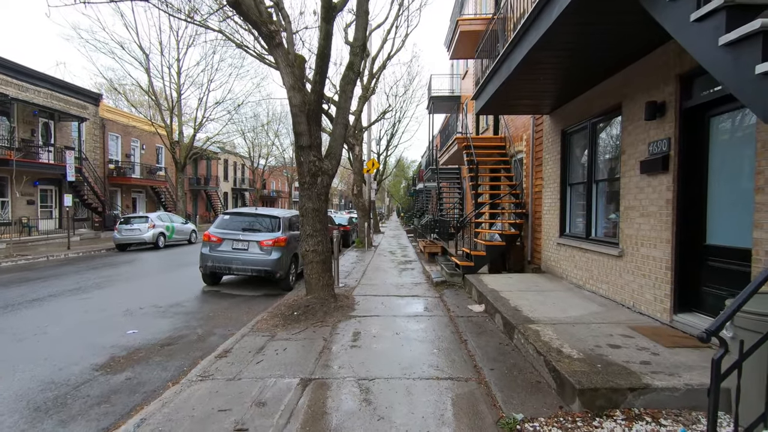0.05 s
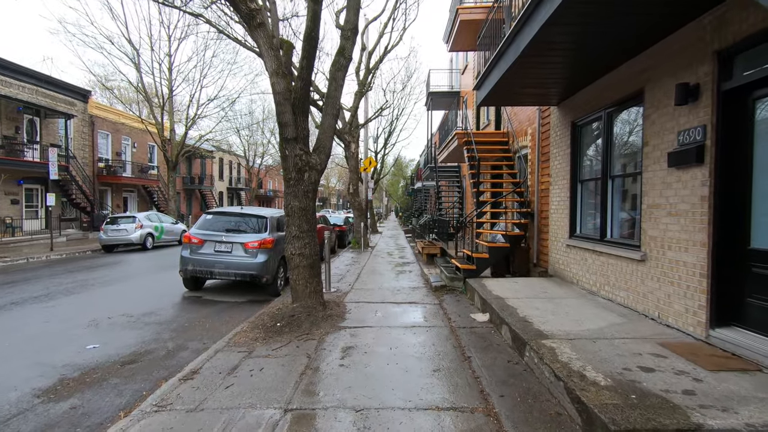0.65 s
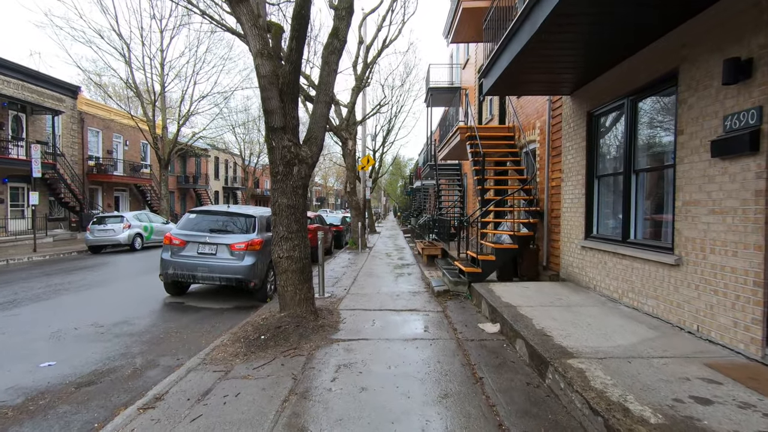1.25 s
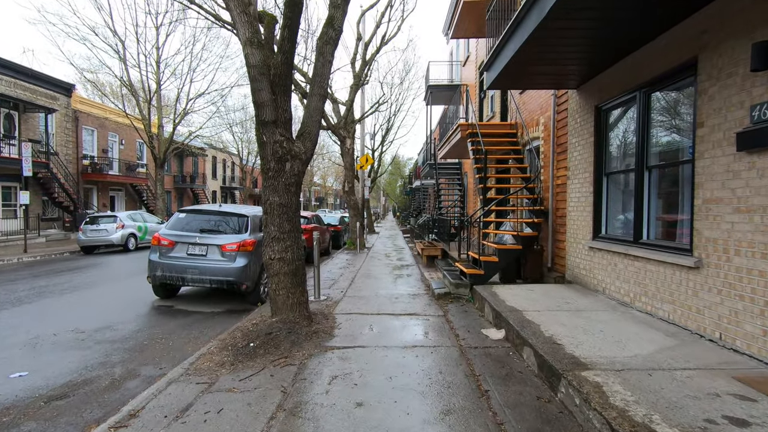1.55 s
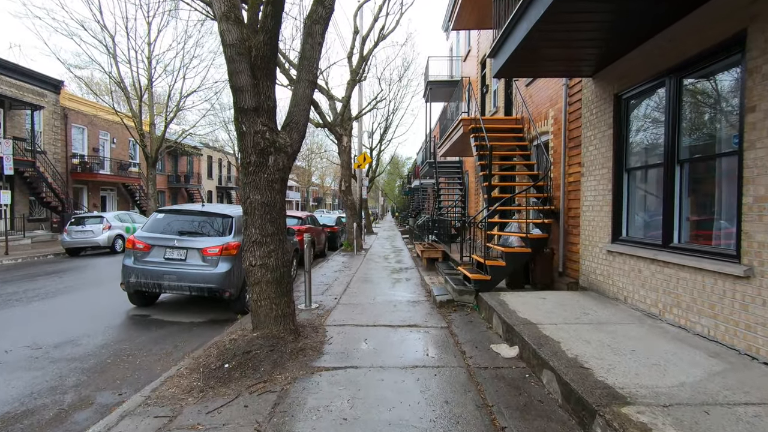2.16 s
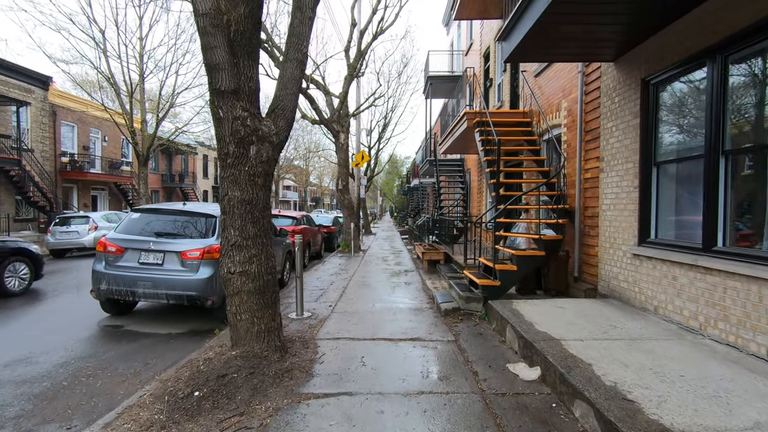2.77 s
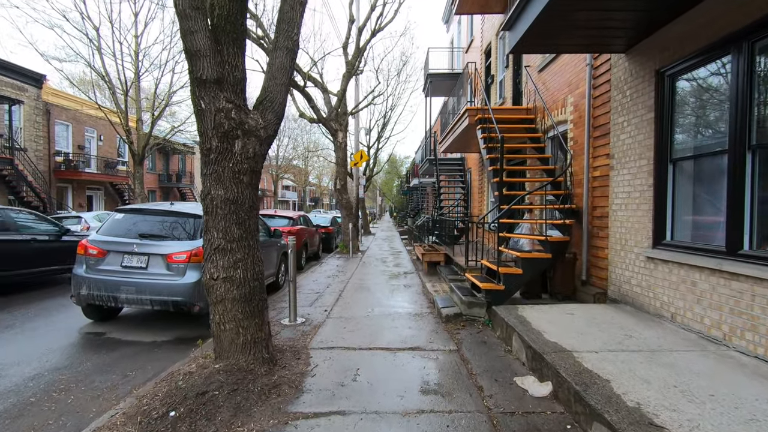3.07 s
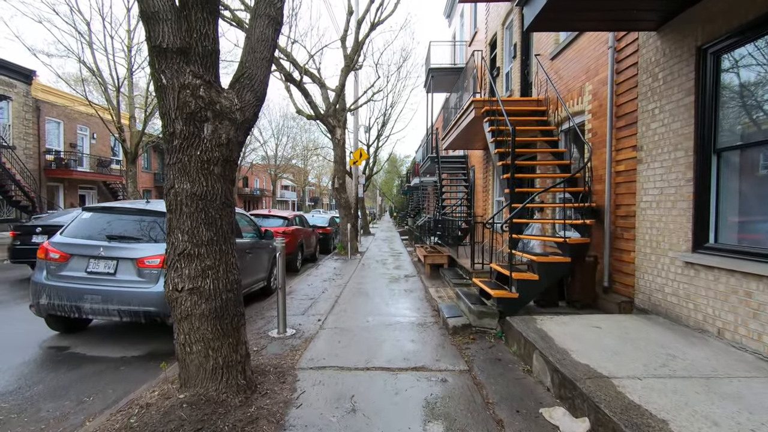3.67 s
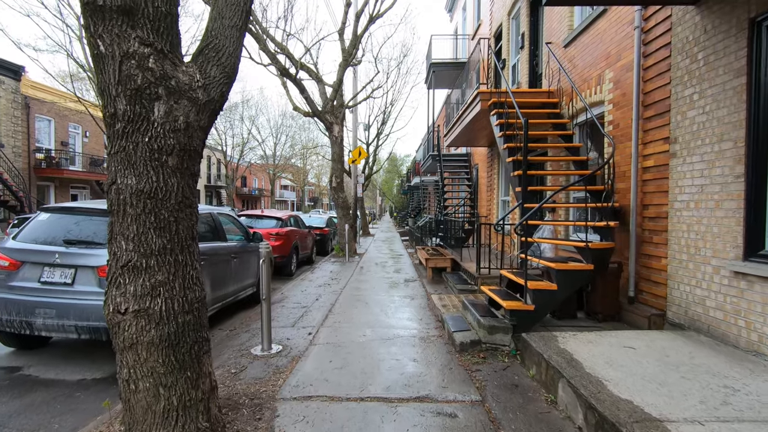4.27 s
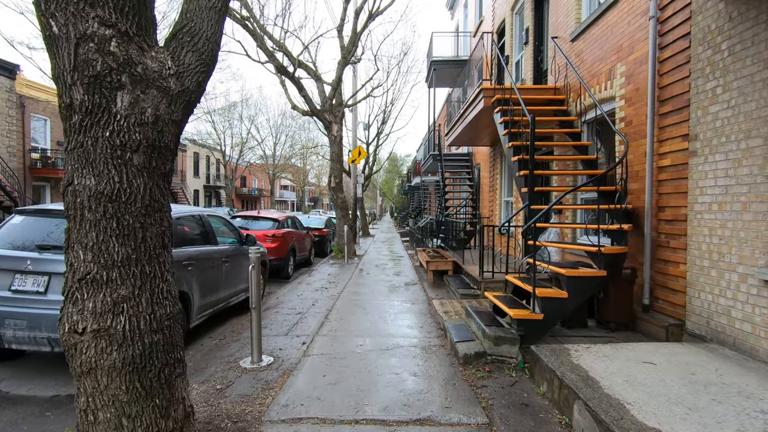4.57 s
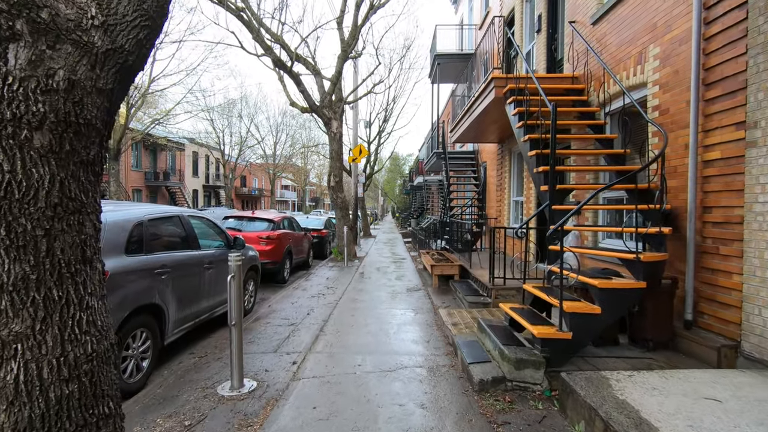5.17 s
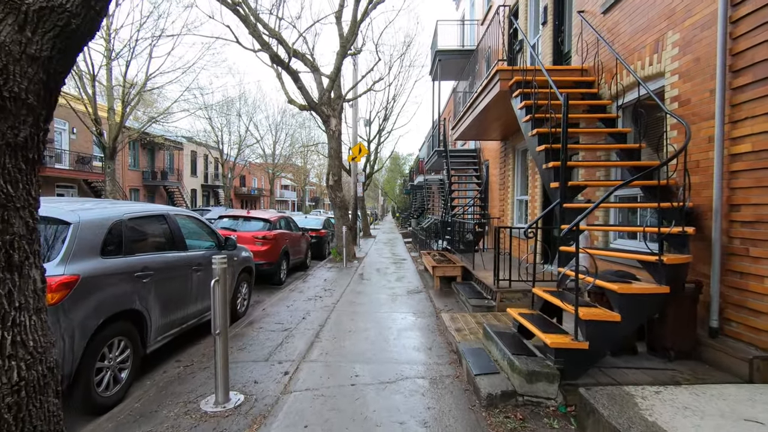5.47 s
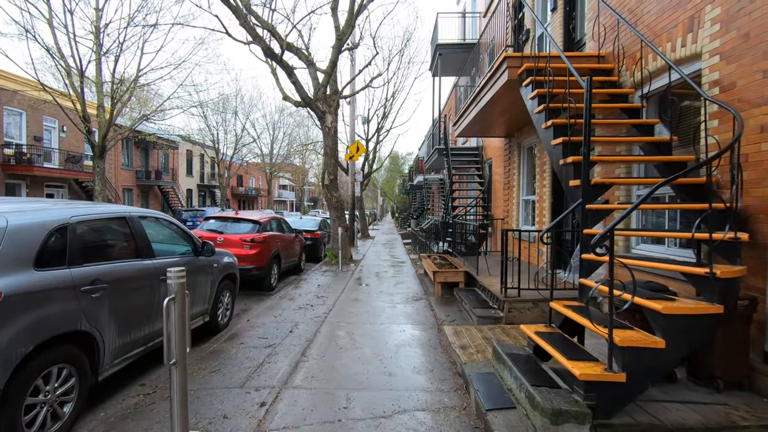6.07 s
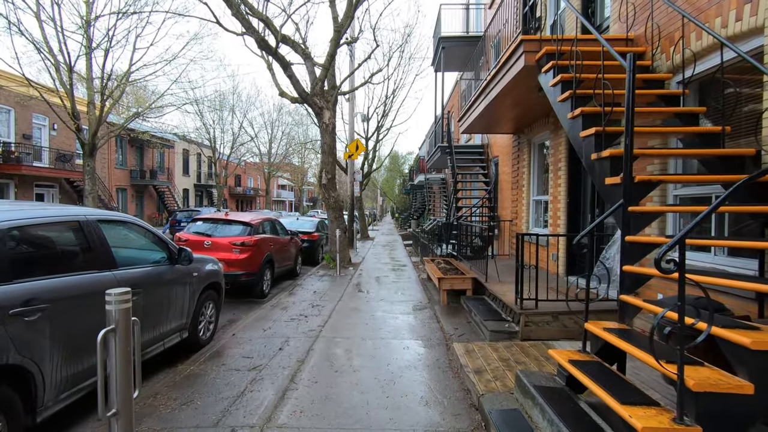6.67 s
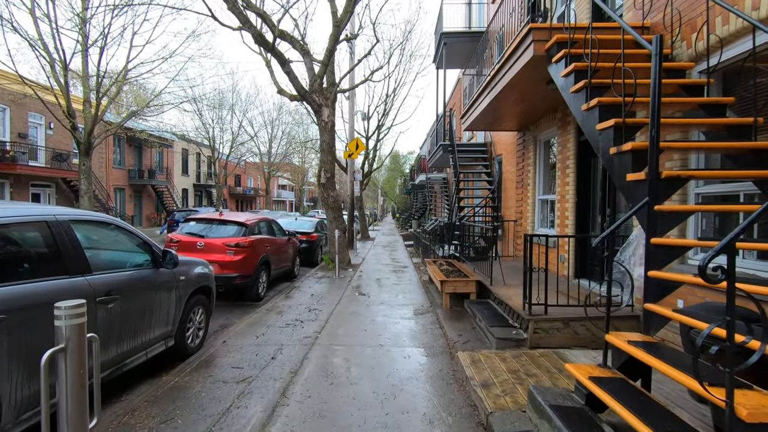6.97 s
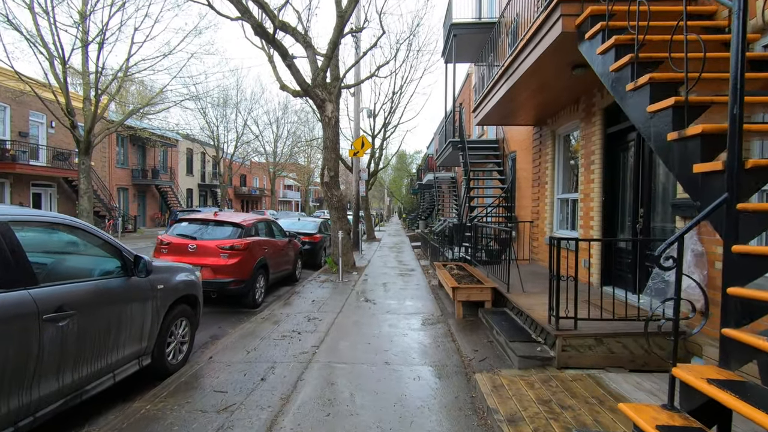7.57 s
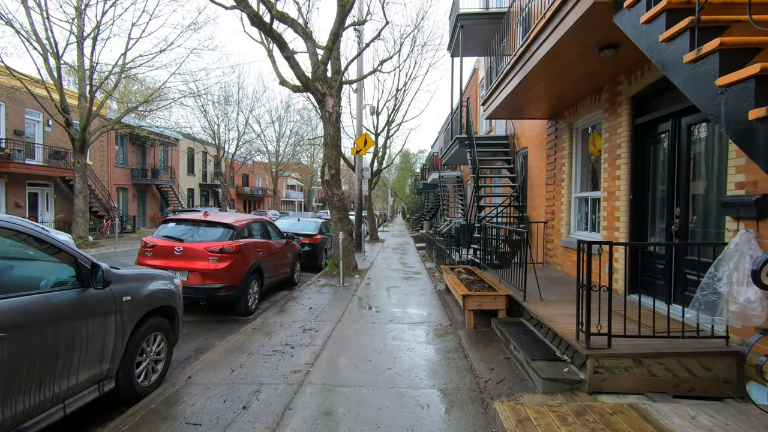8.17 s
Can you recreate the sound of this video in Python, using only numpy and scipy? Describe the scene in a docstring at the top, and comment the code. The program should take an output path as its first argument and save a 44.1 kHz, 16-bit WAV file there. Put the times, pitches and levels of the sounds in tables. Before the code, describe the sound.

Faint rain patters over a steady wash of distant traffic on a wet residential street, heard from the pavement. From about 0.5 seconds a low exhaust drone swells and drops unevenly. A first car passes slightly to the left, its tyre roar, rumble and hissing spray fullest around 2.5 to 3 seconds. Single drops tick nearby, the sharpest at 3.6 seconds. At 4 seconds a heavy hollow body gives a dull, booming knock with a short low rattle and two softer rebounds. A second car approaches and passes around 6.3 seconds with more spray and brief, faint whining tones. The exhaust drone is loudest from 7 to 7.8 seconds. Between 7.2 and 7.7 seconds loose parts rattle and a small hard part taps and clatters. A soft wet swish comes at about 8.2 seconds, at the very end.

```python
"""A wet residential street in light rain, heard from the pavement.
Two cars pass on the left, tyres roaring on the tarmac and throwing spray, over distant traffic and
a low exhaust drone that booms between the houses. Drops tick nearby. Midway a heavy hollow body
gives a dull knock; later loose parts rattle, a small hard part clatters and a wet swish follows."""
import sys
import numpy as np
from scipy import signal
from scipy.fft import rfft, irfft, next_fast_len
from scipy.io import wavfile
from scipy.ndimage import map_coordinates

SR = 44100
rng = np.random.default_rng(int(sys.argv[2]) if len(sys.argv) > 2 else 0)


def master_out(mix):
    """Clip the mix to full scale and print it as 16-bit PCM to the path in sys.argv[1]."""
    frames = np.transpose(np.atleast_2d(mix))
    ceiling = np.clip(frames, -1, 1)
    pcm = np.round(ceiling * 32767).astype(np.int16)
    wavfile.write(sys.argv[1], SR, pcm)


N = 367340
TIME_S = np.arange(N) / SR
LANE_M, SOUND_M_PER_S = 9.7, 343  # lane: distance when abreast

# Passing cars. Each row: time abreast in seconds, speed in m/s, then in dB roar, spray, left bias,
# body rumble and extra rumble from the rear, then rumble screening in dB/m.
PASSING_CARS = [(2.55, 8.1, -39, -47, 2.5, -35.5, -2.5, 1.0), (6.349, 8.9, -40, -46.5, 1.5, -34, 2, 0.41)]
# Tyre noise spectra, one per car. Each row: frequency in Hz, relative density in dB.
FIRST_TYRE_SPECTRUM = [(25, -14.5), (60, -8.5), (130, -2), (215, 1.5), (360, -13.5), (470, -13),
                       (570, -11.5), (700, -8), (1000, -2.5), (1220, -4.5), (1450, -9.5), (1950, -9.5),
                       (2250, -11), (3200, -15.5), (4000, -24), (6000, -41), (9500, -59.5)]
SECOND_TYRE_SPECTRUM = [(25, -15), (60, 0), (150, 1.5), (230, 0), (340, -11), (460, -12.5), (560, -13),
                        (730, -10.5), (1000, -8), (1500, -14), (2000, -12), (2300, -15), (3100, -18.5),
                        (3900, -29.5), (5200, -37.5), (7000, -48.5), (9500, -63)]
# Roar, then spray. Each row: tyre-tarmac horn gain along the road in dB, parked-car screening in dB/m.
TYRE_RADIATION = [(6.5, 2.03), (12, 2.5)]
# Waver of the tread roar. Each row: time in seconds, gain in dB.
ROAR_GAIN = [(1.25, -2.7), (1.55, -0.5), (2.0, -2.5), (2.2, -0.5), (2.5, -4), (2.87, -2), (3.3, 0.4),
             (5.1, -0.5), (5.5, 1), (6.0, -0.9), (6.42, 1.2), (6.9, -2), (7.35, 1)]
# Wet patches under the wheels. Each row: time in seconds, spray gain in dB.
SPRAY_GAIN = [(1.0, 0.5), (1.34, -0.5), (1.46, 3.5), (1.9, 2), (2.55, -1.5), (2.85, 1.7), (3.25, 1),
              (3.92, 0), (5.1, 1.5), (5.42, 2.2), (6.68, 1), (6.9, -1.5), (7.3, 2.5), (7.6, -1.5)]
# Tread hum. Each row: car index, pitch abreast in Hz, width in Hz, peak time and half length
# in seconds, level in dB.
TREAD_BANDS = [(0, 1020, 230, 2.82, 0.45, -43.5), (0, 805, 120, 1.7, 0.5, -50), (1, 738, 55, 6.5, 0.8, -52)]
# Engine speed. Each row: time in seconds, firing rate in Hz.
FIRING_RATE = [(0, 79), (1.2, 73.75), (2.3, 71.5), (3.0, 74.9), (4.2, 77.6), (4.5, 82.04), (5.3, 85.1),
               (5.65, 82.8), (5.98, 83), (6.17, 79.4), (6.32, 80.9), (6.55, 76.1), (7.5, 71.8), (8.33, 71)]
# Exhaust drone. Each row: time in seconds, level in dB before trim and flutter.
DRONE_LEVEL = [(0.0, -47), (0.53, -58), (0.61, -28.5), (0.72, -51.5), (0.88, -30), (0.99, -38), (1.05, -29),
               (1.16, -43), (1.38, -45), (1.49, -36), (1.62, -34.5), (1.72, -51), (1.83, -27), (1.89, -37),
               (1.93, -54), (1.98, -33.5), (2.25, -27), (2.42, -28), (2.49, -37), (2.59, -30.5),
               (2.74, -35), (2.81, -55), (2.9, -34.5), (3.09, -48), (3.16, -32.5), (3.5, -42),
               (3.64, -25.5), (3.81, -39), (4.54, -30), (5.94, -27.5), (6.26, -46), (6.47, -32.5),
               (6.54, -25.5), (6.68, -23), (7.0, -20.5), (7.31, -21), (7.37, -25.5), (7.45, -17.5),
               (7.74, -20), (7.94, -30), (8.01, -23), (8.12, -33.5), (8.2, -29), (8.33, -35)]
# Exhaust overtones. Each row: multiple of the firing rate, level in dB abreast at full load.
LOAD_OVERTONES = [(2, -34.5), (3, -50.5), (4, -44)]
# Tones of the second car. Each row: centre and half length in seconds, pitch in Hz, level in dB.
WHINE_SWELLS = [(6.305, 0.04, 166, -32), (6.31, 0.083, 384, -43), (6.683, 0.085, 436, -41),
                (7.162, 0.07, 434, -47.5), (7.431, 0.065, 435, -46), (7.518, 0.14, 385, -46.5),
                (7.601, 0.06, 724.6, -52)]
# Knock and rebounds. Each row: time in seconds, impulse in dB, contact time in seconds.
KNOCK_CONTACTS = [(3.957, -27, 0.0025), (3.975, -23.5, 0.0093), (3.993, -17, 0.0036), (4.167, -34, 0.0039),
                  (4.286, -29, 0.0038)]
# Modes of the hollow body and the hard part. Each row: frequency in Hz, gain in dB, T60 in seconds.
HOLLOW_BODY_MODES = [(52.6, -5, 0.94), (109, -4.5, 0.35), (147.6, 7, 0.17), (248, 4.5, 0.24), (318, -3, .2),
                     (476, -11, .22)]
HARD_PART_MODES = [(1690, -3, 0.026), (1980, -6, 0.016), (2550, -4, 0.012), (3200, -7.5, 0.012)]
# Hard part's tap and bounces. Each row: start in seconds, strength in dB, left bias in dB.
TAP_CONTACTS = [(7.2222, -36, 7), (7.4405, -37.5, -6), (7.4448, -29.5, -3), (7.4485, -33, 7)]
# Loose parts. Each row: start in seconds, level in dB, centre and width in Hz, T60 in seconds.
RATTLE_BURSTS = [(3.992, -31, 269, 40, 0.42), (7.309, -37, 1020, 300, 0.24), (7.337, -37.5, 900, 700, 0.12),
                 (7.595, -40, 730, 130, 0.3), (7.612, -43, 1100, 400, 0.2)]
# Nearby drops. Each row: start in seconds, peak in dB, left bias in dB, pitch in Hz.
NEAR_DROPS = [(0.7205, -42, 3, 4000), (0.8545, -46.5, 6, 4500), (2.6045, -42, 4, 3800),
              (3.5833, -32, 2, 2650), (3.7812, -40, 2, 4000), (3.811, -43.5, 0, 4600),
              (3.8735, -45, 5, 4600), (4.1235, -46, 3, 4200), (4.41, -46, -3, 3770), (5.0053, -44, 0, 4300),
              (5.2345, -43, 0, 3900)]
# Wet swish: centre in seconds, half length in seconds, level in dB.
WET_SWISH = (8.23, 0.068, -46)
# Distant traffic and rain. Each row: frequency in Hz, relative density in dB.
CITY_SPECTRUM = [(20, -8.5), (50, 0), (100, 2.5), (150, 1), (220, -5), (320, -9.5), (450, -13.5),
                 (560, -17), (720, -12.5), (920, -13.5), (1300, -17.5), (1900, -18.5), (2300, -23),
                 (3100, -26.5), (3900, -36), (5200, -45), (6200, -52.5), (9500, -76)]
# Low street rumble. Each row: time in seconds, gain in dB.
RUMBLE_GAIN = [(0.1, -2.5), (0.45, 1), (0.72, 0), (1.05, 0.5), (1.2, -7), (1.36, -7.5), (1.5, 2.5),
               (1.7, -6), (2.2, 0.5), (2.65, -0.5), (2.95, -2.5), (3.45, 1), (4.6, 0), (5.9, -1), (6.8, -1),
               (7.6, 0), (8.1, 2.5)]
# Stereo width of the noise. Each row: frequency in Hz, side over mid in dB.
STEREO_WIDTH = [(30, -20.5), (80, -22), (130, -29.5), (250, -21.5), (450, -1), (620, -6.5), (900, 0.5),
                (1500, -1.5), (3800, -3), (5300, 3), (8000, 0)]


def car(row, spectrum, splash_db, direct_db, uneven_db=.5, left_lead_ms=0.064):
    """Body rumble, tread roar and spray swell as the car nears; uneven water makes the spray flutter."""
    abreast_s, speed_m_per_s, roar_db, spray_db, left_db, rumble_db, rear_db, body_db_per_m = row
    distance_m, heading = passage(abreast_s, speed_m_per_s)
    spread_db = 20 * np.log10(LANE_M / distance_m)
    beyond_m = distance_m - LANE_M
    rumble_swell_db = spread_db + rear_db * heading - body_db_per_m * beyond_m
    roar_swell_db, spray_swell_db = (
        spread_db + horn_db * heading ** 2 - screen_db_per_m * beyond_m + curve(waver)
        for (horn_db, screen_db_per_m), waver in zip(TYRE_RADIATION, (ROAR_GAIN, SPRAY_GAIN)))
    rumble = at_level(band(diffuse(spectrum), 38, 513, order=4), rumble_db + rumble_swell_db)
    roar = band(diffuse(spectrum), 435, 1700, order=4)
    roar = at_level(roar, roar_db + roar_swell_db + uneven_db * drift(5))
    # spray heard straight from the wheels reaches the left ear first
    left = band(diffuse(spectrum)[0], 3000, 6900)
    right = map_coordinates(left, [np.arange(N) - left_lead_ms * SR / 1000], order=3)
    hiss = band(diffuse(spectrum), 1630, 10000, order=4) + from_db(direct_db) * np.array([left, right])
    spray = at_level(hiss, spray_db + spray_swell_db + splash_db * drift(35))
    pan_db = left_db - 0.5 * heading  # further left on approach
    return rumble + panned(roar, 0.82 * pan_db) + panned(spray, pan_db)


def tread_hum(row):
    """Tread blocks hum in a narrow band, higher on approach, lower going away."""
    car_index, hz, width_hz, peak_s, half_length_s, level_db = row
    abreast_s, speed_m_per_s = PASSING_CARS[int(car_index)][:2]
    _, heading = passage(abreast_s, speed_m_per_s)
    doppler_hz = hz / (1 + heading * speed_m_per_s / SOUND_M_PER_S)
    phase = 2 * np.pi * np.cumsum(doppler_hz) / SR
    sine, cosine = np.sin(phase), np.cos(phase)
    hum = np.array([drift(width_hz / 2) * sine + drift(width_hz / 2) * cosine for _ in range(2)])
    return panned(at_level(hum, level_db), 1.5) * swell(peak_s, half_length_s)


def exhaust(coast_hz=76.6, full_load_hz=81.8, trim_db=-1.5, octave_db=-23.5, smear_rad=.19):
    """The firing note booms between houses; load brings out overtones near the second car."""
    firing_hz, drone_db = curve(FIRING_RATE), curve(DRONE_LEVEL)
    phase = 2 * np.pi * np.cumsum(firing_hz * (1 + 0.011915 * drift(8))) / SR
    # reflections flutter the drone, least when loud and near, and smear the overtones
    steady_above_db, flutter_below_db = -24, -39.5
    flutter_db = 2.5 * np.clip((steady_above_db - drone_db) / (steady_above_db - flutter_below_db), .15, 1)
    boom = from_db(drone_db + trim_db + flutter_db * drift(4.6))
    note = boom * (np.sin(phase) + from_db(octave_db) * np.sin(2 * phase))
    load = np.clip((firing_hz - coast_hz) / (full_load_hz - coast_hz), 0, 1) ** 2
    distance_m, _ = passage(*PASSING_CARS[1][:2])
    nearness = (LANE_M / distance_m) ** 2.17
    for multiple, level_db in LOAD_OVERTONES:
        overtone = np.sin(multiple * (phase + smear_rad * drift(12)))
        note += load * nearness * from_db(level_db + 2.15 * drift(5.1)) * overtone
    return np.sqrt(2) * note


def whine(smear_rad=0.63):
    """Engine and running-gear tones swell and fade, smeared by shifting paths along the street."""
    tones = np.zeros(N)
    for centre_s, half_length_s, hz, level_db in WHINE_SWELLS:
        phase = 2 * np.pi * hz * TIME_S + smear_rad * drift(16)
        tones += from_db(level_db) * swell(centre_s, half_length_s) * np.sin(phase)
    return street_reverb(panned(np.sqrt(2) * tones, -1), t60_s=0.39, wet_db=-12)


def knock():
    """Soft contacts set a hollow body booming; a longer contact is duller."""
    force = np.zeros(N)
    for centre_s, impulse_db, contact_s in KNOCK_CONTACTS:
        push = np.exp(-np.pi * ((TIME_S - centre_s) / contact_s) ** 2)
        force += from_db(impulse_db) * push / push.sum()
    t = TIME_S[:SR]
    ring = sum(from_db(gain_db - 60 * t / t60_s) * np.sin(2 * np.pi * hz * t)
               for hz, gain_db, t60_s in HOLLOW_BODY_MODES)
    return signal.fftconvolve(force, ring)[:N]


def taps(uneven_db=2.5):
    """Crisp contacts ring a small hard part, each with its own mix of modes."""
    out = np.zeros((2, N))
    t = TIME_S[:SR // 8]
    for start_s, strength_db, pan_db in TAP_CONTACTS:
        ring = np.zeros(len(t))
        for hz, gain_db, t60_s in HARD_PART_MODES:
            mode_db = strength_db + gain_db + uneven_db * rng.standard_normal()
            ring += from_db(mode_db - 60 * t / t60_s) * np.sin(2 * np.pi * hz * t)
        start = round(start_s * SR)
        out[:, start:start + len(t)] += panned(ring, pan_db)
    return street_reverb(band(out, 700, 3300, order=4), t60_s=0.24, wet_db=-12)


def rattles(rise_s=0.004):
    """Loose parts rattle and scuff, each round one pitch, blurred by distance."""
    out = np.zeros(N + SR)
    t = TIME_S[:SR // 2]
    rise = np.minimum(t / rise_s, 1)
    for start_s, level_db, hz, width_hz, t60_s in RATTLE_BURSTS:
        burst = band(rng.standard_normal(len(t)), hz - width_hz / 2, hz + width_hz / 2, order=1)
        start = round(start_s * SR)
        out[start:start + len(t)] += unit_rms(burst) * rise * from_db(level_db - 60 * t / t60_s)
    return street_reverb(panned(band(out[:N], 200, 3000, order=4), 2.2), t60_s=0.2, wet_db=-11)


def near_drops(t60_cycles=8.2):
    """Big drops hit the pavement close by, one sharp tick each."""
    out = np.zeros((2, N))
    t = TIME_S[:SR // 50]
    for start_s, peak_db, pan_db, hz in NEAR_DROPS:
        ring = np.sin(2 * np.pi * hz * t) * from_db(-60 * t * hz / t60_cycles)
        tick = band(ring, 1800, 5800, order=3)
        start = round(start_s * SR)
        out[:, start:start + len(t)] += panned(tick / np.abs(tick).max() * from_db(peak_db), pan_db)
    return street_reverb(out, t60_s=.25, wet_db=-8)


def swish():
    """One soft swell of wet hiss."""
    centre_s, half_length_s, level_db = WET_SWISH
    return at_level(band(diffuse(CITY_SPECTRUM), 1050, 4700), level_db) * swell(centre_s, half_length_s)


def patter(drops_per_s=450, pitches=10, spread_db=4.0, level_db=-59.5):
    """Small drops land at random all round, each ringing for a few cycles."""
    out = np.zeros((2, N))
    count = int(drops_per_s * N / SR / pitches)
    for hz in np.geomspace(1500, 4500, pitches):
        starts = rng.integers(0, N, count)
        sizes = from_db(spread_db * np.minimum(rng.exponential(1, count), 4))
        signs = rng.choice([-1, 1], count)
        clicks = np.zeros((2, N))
        clicks[:, starts] = panned(sizes * signs, rng.normal(0, 4.4, count))
        out += band(clicks, hz / np.sqrt(2), hz * np.sqrt(2), order=1) / hz ** 2
    return at_level(band(out, 1200, 3900, order=3), level_db)


def distant_city(level_db=-38):
    """Far traffic and rain merge into a steady wash."""
    return at_level(diffuse(CITY_SPECTRUM), level_db)


def surge_rumble(x, edge_hz=190):
    """The bass rises and sinks."""
    bass = signal.sosfiltfilt(signal.butter(2, edge_hz, fs=SR, output="sos"), x)
    return x + (from_db(curve(RUMBLE_GAIN)) - 1) * bass


def diffuse(spectrum):
    """Stereo noise: narrow in the bass, wide in the treble."""
    size = next_fast_len(N, real=True)
    hz = np.arange(size // 2 + 1) * SR / size
    mid, side = rfft(rng.standard_normal((2, size))) * gain_at(spectrum, hz)
    side = side * gain_at(STEREO_WIDTH, hz)
    return irfft([mid + side, mid - side], size)[:, :N]


def street_reverb(x, t60_s, wet_db):
    """Add decaying scatter from facades and parked cars."""
    t = TIME_S[:SR]
    tail = rng.standard_normal((2, SR)) * from_db(-60 * t / t60_s) * (t > .008)
    tail /= np.sqrt(np.sum(tail ** 2) / 2)
    return x + from_db(wet_db) * signal.fftconvolve(x, tail, axes=1)[:, :N]


def passage(abreast_s, speed_m_per_s):
    """A car's distance and heading: -1 far off approaching, 0 abreast, 1 far off receding."""
    along_m = speed_m_per_s * (TIME_S - abreast_s)
    distance_m = np.hypot(along_m, LANE_M)
    return distance_m, along_m / distance_m


def drift(rate_hz):
    """Smooth random wander, RMS 1."""
    knots = rng.standard_normal(int(N / SR * rate_hz * 2) + 4)
    coarse_s = TIME_S[::20]
    wander = map_coordinates(knots, [coarse_s * rate_hz * 2], order=3)
    return np.interp(TIME_S, coarse_s, unit_rms(wander))


def swell(centre_s, half_length_s):
    """Gaussian envelope."""
    return np.exp(-((TIME_S - centre_s) / half_length_s) ** 2)


def curve(rows):
    """Time-value rows, interpolated per sample."""
    return np.interp(TIME_S, *np.transpose(rows))


def gain_at(spectrum, hz):
    """Spectrum gain, interpolated in log frequency."""
    knots_hz, levels_db = np.transpose(spectrum)
    return from_db(np.interp(np.log(hz + 1e-9), np.log(knots_hz), levels_db))


def band(x, low_hz, high_hz, order=2):
    """Causal band-pass."""
    return signal.sosfilt(signal.butter(order, [low_hz, high_hz], "band", fs=SR, output="sos"), x + 1e-18)


def panned(x, left_db):
    """Pan by level difference; positive is left."""
    return x * from_db(np.array([[.5], [-.5]]) * left_db)


def at_level(stereo, level_db):
    """Scale by the RMS of the mid signal."""
    return stereo / np.std(stereo.mean(axis=0)) * from_db(level_db)


def unit_rms(x):
    return x / np.sqrt(np.mean(x ** 2) + 1e-20)


def from_db(db):
    return 10 ** (np.asarray(db) / 20)


def scene():
    """City wash, two cars, knock, rain and clatter."""
    city = distant_city()
    first = car(PASSING_CARS[0], FIRST_TYRE_SPECTRUM, splash_db=1.26, direct_db=-7.5)
    second = car(PASSING_CARS[1], SECOND_TYRE_SPECTRUM, splash_db=0.76, direct_db=-5.0)
    traffic = surge_rumble(city + first + second) + sum(map(tread_hum, TREAD_BANDS))
    booms = panned(exhaust() + knock(), -.3)
    return traffic + booms + whine() + patter() + near_drops() + rattles() + taps() + swish()


def record(dry):
    """Band-limit to 20-10100 Hz."""
    dry = signal.sosfilt(signal.butter(2, 20, "high", fs=SR, output="sos"), dry)
    return signal.sosfilt(signal.ellip(10, .1, 80, 10100, fs=SR, output="sos"), dry)


dry = scene()
out = record(dry)
master_out(out)
```